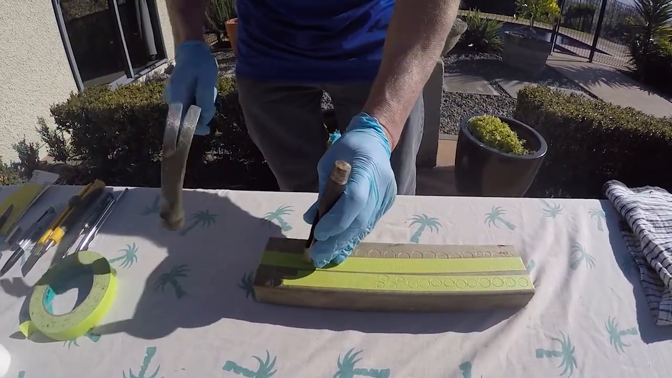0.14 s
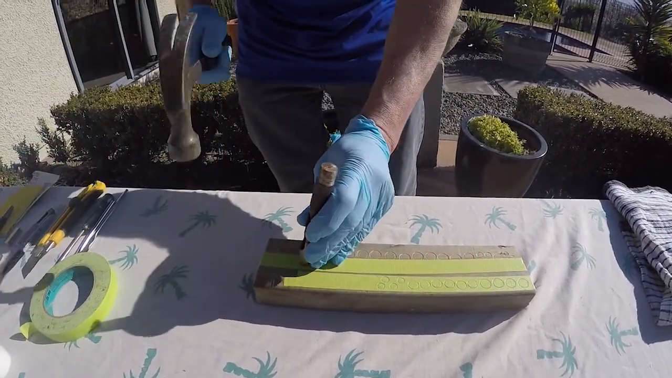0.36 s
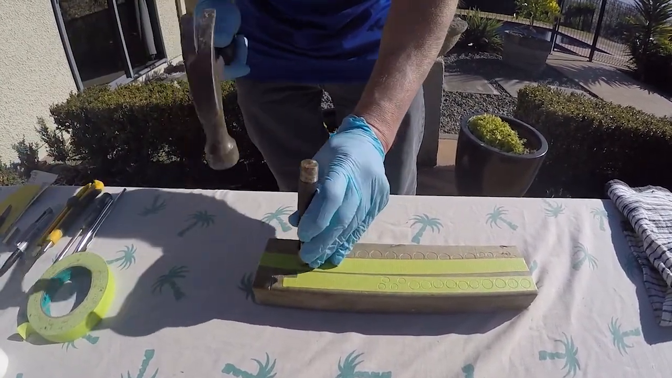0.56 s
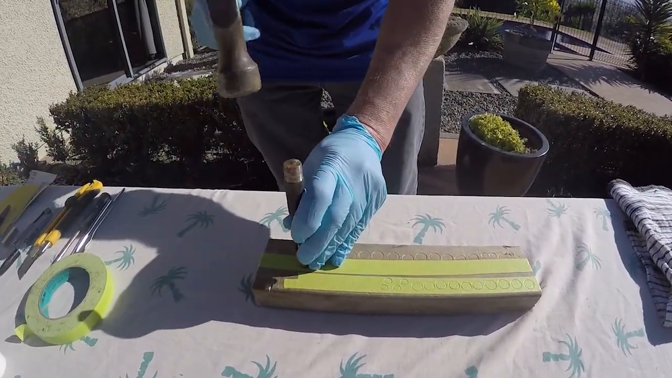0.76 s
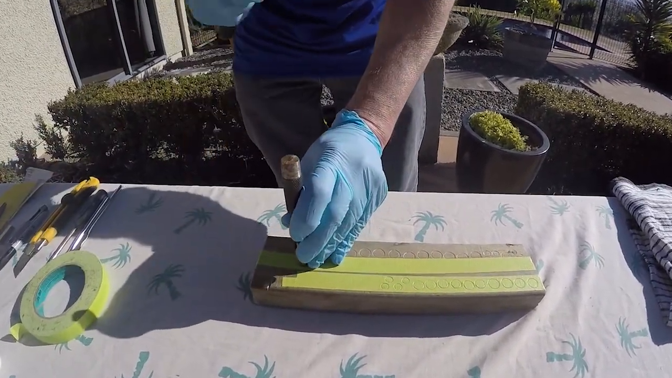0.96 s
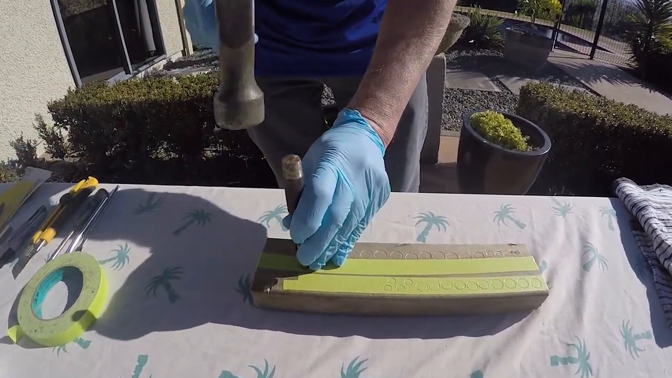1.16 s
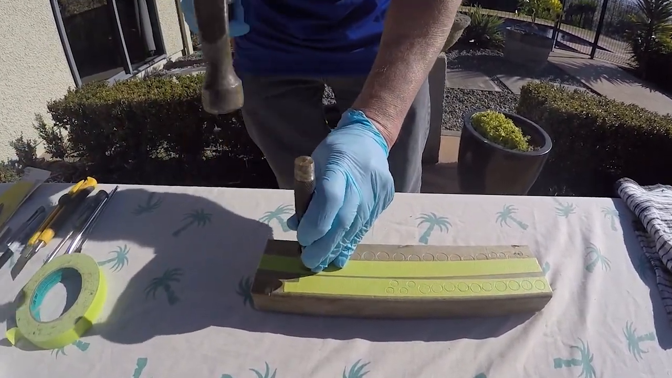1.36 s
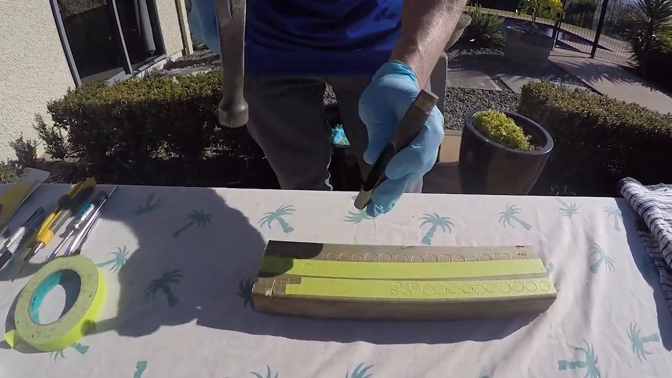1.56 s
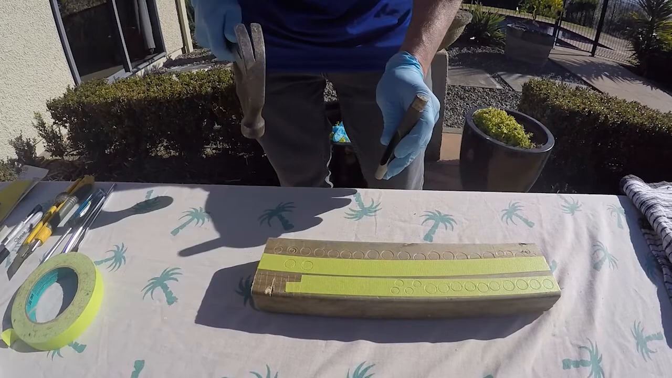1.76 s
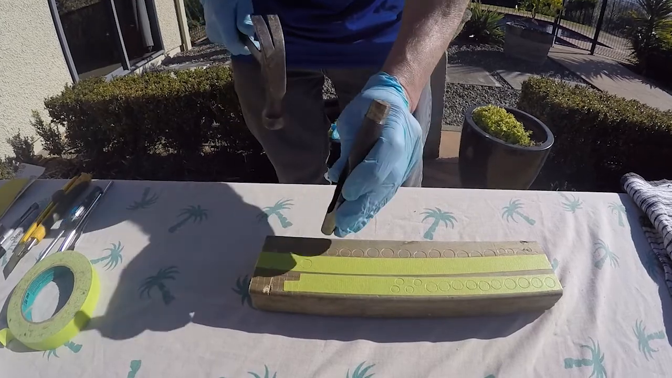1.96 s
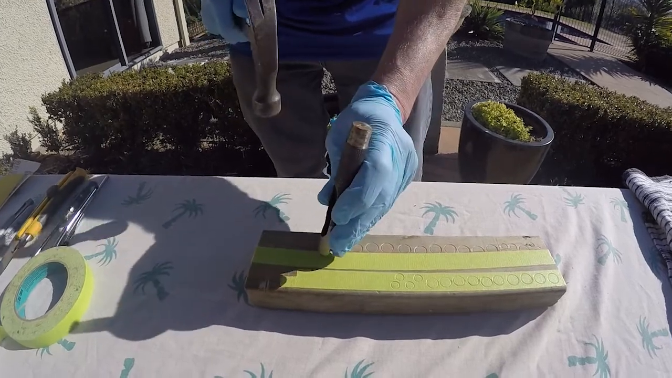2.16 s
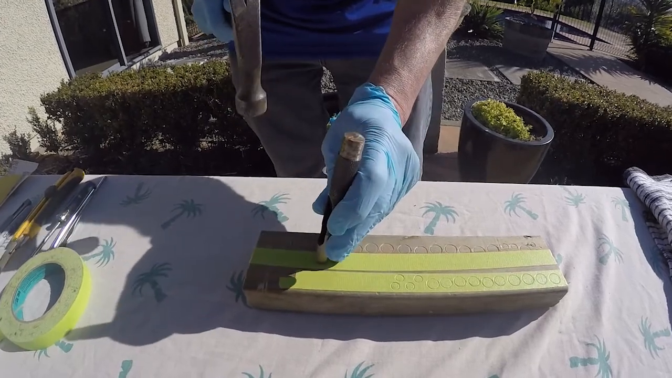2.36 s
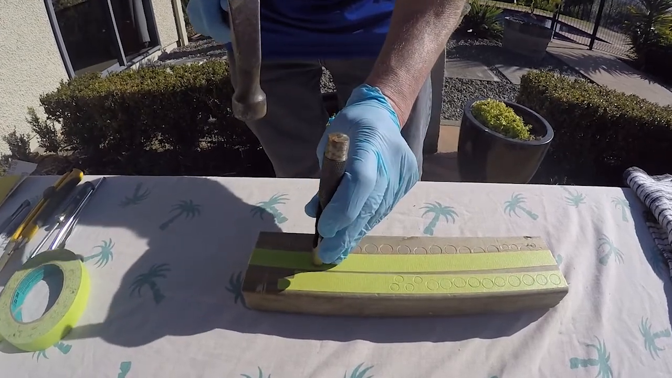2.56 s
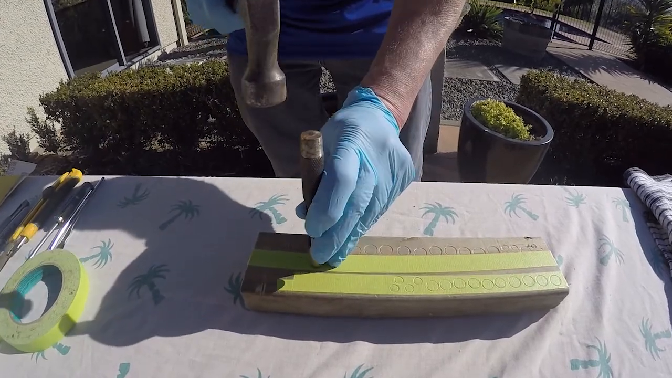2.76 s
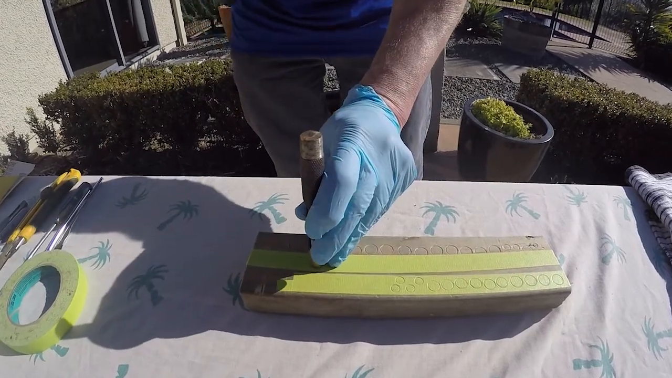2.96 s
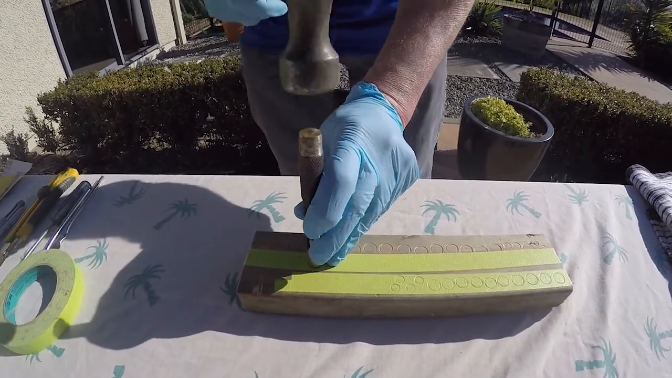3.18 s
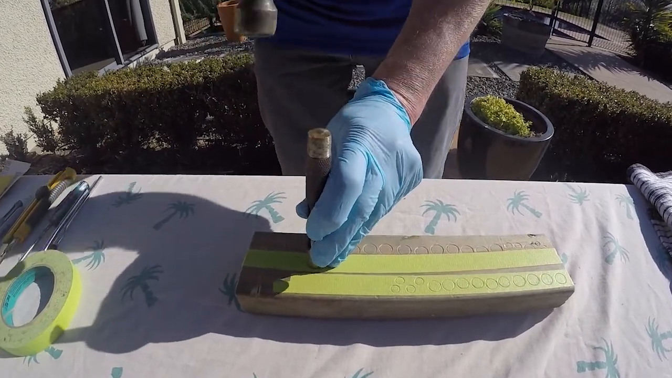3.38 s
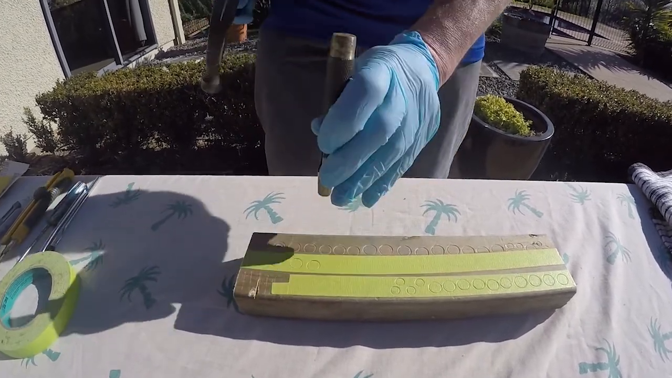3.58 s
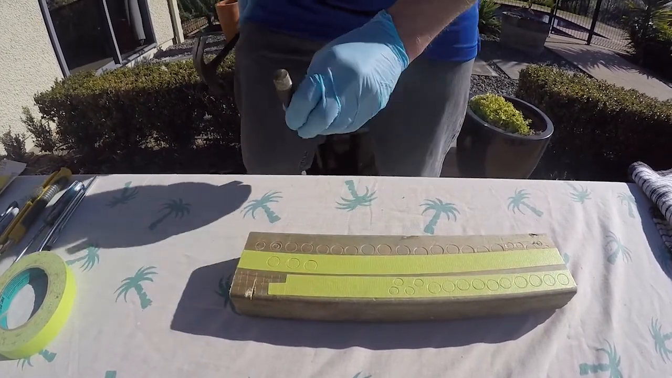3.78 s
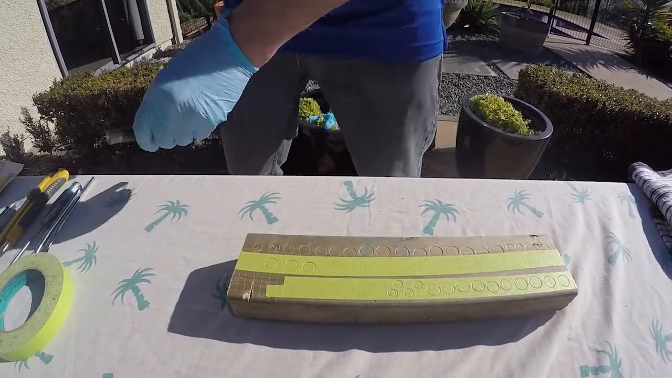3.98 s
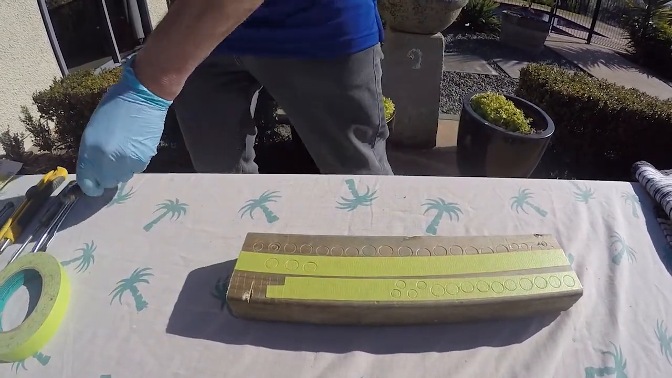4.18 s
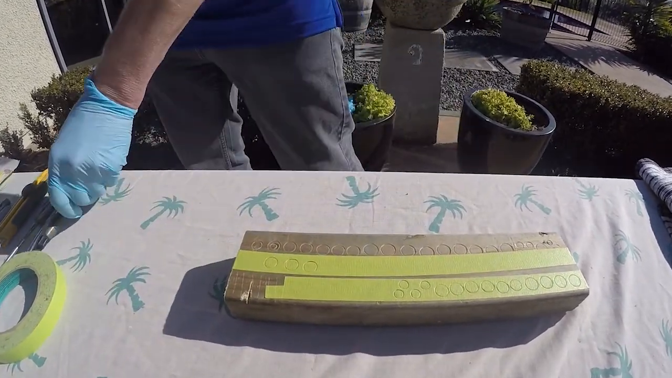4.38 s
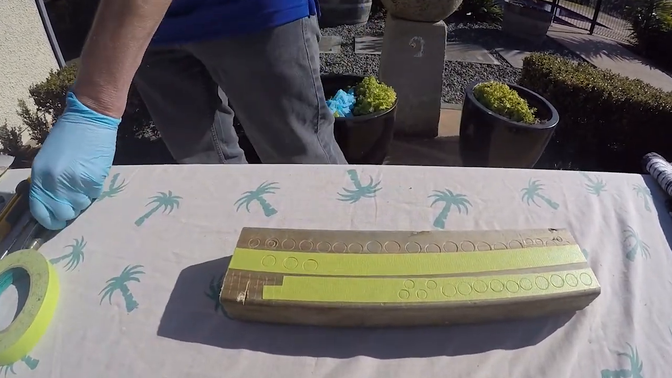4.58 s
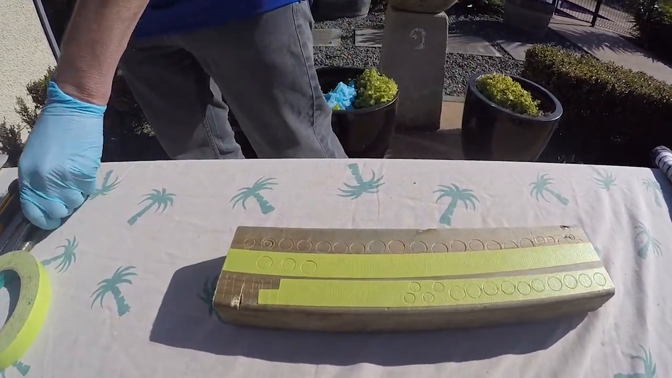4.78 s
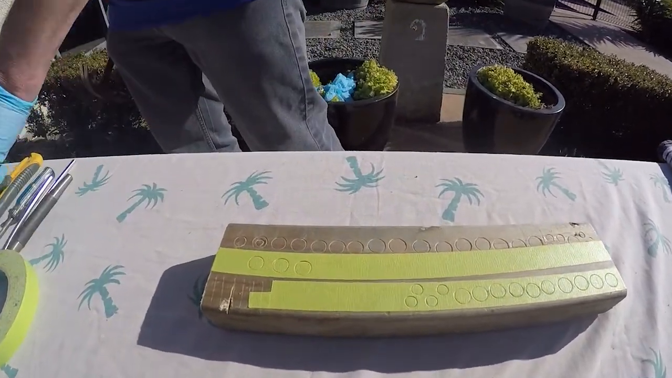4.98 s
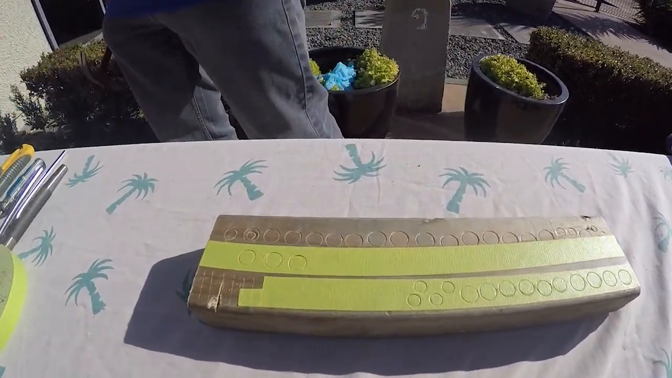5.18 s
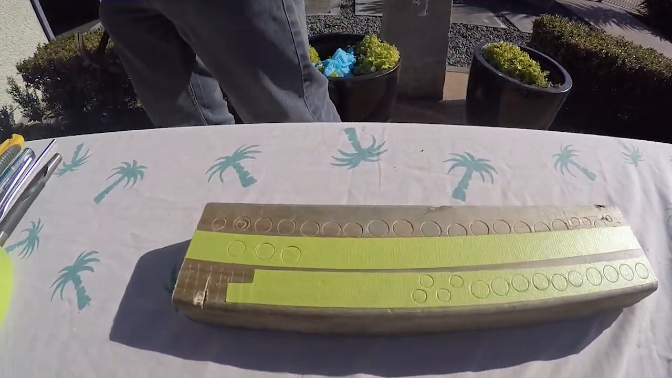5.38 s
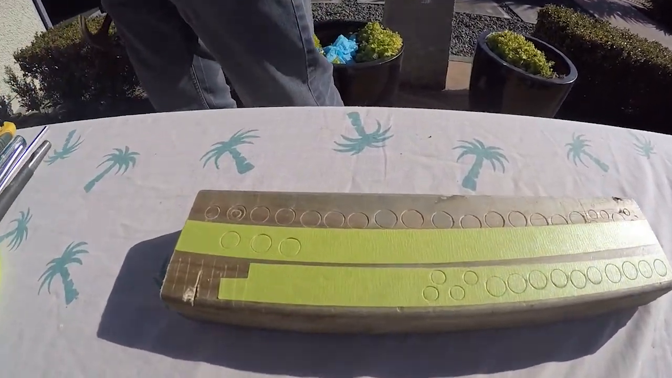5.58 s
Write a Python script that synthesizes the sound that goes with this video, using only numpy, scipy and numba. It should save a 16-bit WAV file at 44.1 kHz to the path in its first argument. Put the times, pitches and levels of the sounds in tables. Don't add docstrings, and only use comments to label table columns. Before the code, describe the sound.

Outdoors, a hammer hits a steel punch on a wooden block twice, loud cracking blows over a low throbbing hum, then both tools are laid down.

```python
import sys
import numpy as np
from scipy import signal
from scipy.fft import rfft, irfft
from scipy.io import wavfile
from scipy.ndimage import uniform_filter1d
from numba import njit

SR = 44100
rng = np.random.default_rng(int(sys.argv[2]) if len(sys.argv) > 2 else 0)


def rack_gain(trim_db):
    fader = np.asarray(trim_db, float)
    return 10 ** (fader / 20)


def unload_audio(sound):
    columns = np.transpose(np.atleast_2d(sound))
    steps = np.round(np.clip(columns, -1, 1) * 32767)
    wavfile.write(sys.argv[1], SR, steps.astype(np.int16))


N = 248660
T = np.arange(N) / SR

# start_s, level_db, steel_ring_db, table_boom_db, punch_ring_db
BLOWS = [
    (1.0628, 9.5, -0.7, -1.5, -5.5),
    (3.094, 8.5, -11, 0.15, 0),
]
# pitch_hz, level_db, t60_s
STEEL = [(2454, -6, .025), (3000, -8, 0.011), (3788, -2.5, 0.019), (4330, -1, 0.013), (5420, -4.5, 0.018),
         (6430, -9.5, 0.0054), (12080, -25, .01)]
# pitch_hz, level_db, t60_s
HAMMER_FACE = [(2876, -4, 0.024), (5095, -2.5, .018), (6030, -8.5, .016), (7880, -8, .02),
               (11075, -13, 0.011)]
# pitch_hz, level_db, t60_s
HAMMER_HEAD = [(2890, -34, .2), (7760, -43, .2), (7951, -40, .28), (8130, -42, .18)]
# pitch_hz, level_db, t60_s
BLOCK = [(638, -14, .06), (841.7, -16, 0.04), (1000, -14, 0.05), (1163, -17.5, .05), (1503, -9.5, .04),
         (1620, -16, 0.05), (2040, -16, 0.03), (2330, -17.5, 0.067)]
# pitch_hz, level_db, t60_s
TABLE = [(52, -18, .12), (93.5, -12, 0.1), (112.2, -2.5, .2), (189.8, -30.5, 0.98), (208.9, -21, .1),
         (257.2, -20, 0.019), (336.3, -22.5, .15), (400, -20, .06), (460, -21, 0.1), (514, -18, 0.09)]
# pitch_hz, level_db, t60_s
LEGS = [(34.8, -11.5, 0.3)]
# delay_s, level_db, centre_hz, smear_t60_s
ECHOES = [(.017, -32.5, 8517, .03), (.042, -31, 3200, 0.013), (.056, -45, 9000, 0.038),
          (.094, -47.5, 7000, 0.057), (.106, -40, 4500, 0.032), (.125, -64, 7000, .5),
          (0.17, -58.5, 3500, 0.084), (.377, -60, 1780, 0.031)]
# pitch_hz, level_db, t60_s
YARD = [(178.4, -27.5, 0.36), (330, -24.5, .3), (570, -24, 0.28), (966, -24, 0.28), (1590, -26.5, .34),
        (2820, -28.5, 0.29), (4500, -37, 0.13), (7000, -45.5, 0.13), (11000, -51, 0.24)]
# start_s, level_db
PUNCH_DOWN = [
    (4.578, -9),
    (4.5806, -10),
]
# pitch_hz, level_db, t60_s
PUNCH = [(375, -8, 0.037), (520, -13, 0.1), (770, -9, 0.015), (930, 2, 0.035), (1176, -4.5, 0.035),
         (1420, -1, 0.031), (1730, -2.5, 0.017), (2060, -7, 0.025), (2580, -1, 0.017), (3250, -2, 0.016),
         (4090, -13, 0.0099)]
# pitch_hz, level_db, t60_s
SHANK = [(4565, -40.5, .29), (4838, -42.5, .19)]
# start_s, level_db
HAMMER_DOWN = [
    (5.5473, -14),
    (5.5512, -26),
]
# pitch_hz, level_db, t60_s
HANDLE = [(400, -8.5, .05), (543, -10, 0.066), (757, -5, 0.08), (984, -2.5, 0.055), (1100, 7, 0.012),
          (1308, -9, 0.05), (1614, -2, 0.055), (2010, -13, 0.025), (3460, -13, 0.014)]
# start_s, peak_db, pitch_hz, t60_s
THUDS = [(0.371, -50, 400, 0.11), (0.374, -30.5, 108, 0.094), (2.54, -37, 330, 0.07),
         (4.566, -23, 700, 0.08), (4.567, -45.5, 5700, 0.1), (4.577, -27, 195, 0.096),
         (5.636, -35, 600, 0.046)]
# start_s, peak_db, pitch_hz
TICKS = [(1.146, -31.5, 2010), (1.198, -30, 3200), (1.2, -38, 9000), (1.440, -49, 8000),
         (3.127, -30, 3000), (3.139, -34.5, 3460), (4.24, -46, 2500), (4.30, -51, 2014),
         (4.622, -58.5, 3980), (5.482, -45.5, 5960), (5.490, -43, 3430), (5.497, -52, 8000),
         (5.497, -40, 2500), (5.511, -61, 9000), (5.522, -50.5, 6000)]
# start_s, hold_s, level_db, rise_s, fall_s (rise and fall over 20 dB)
BRUSH = [(0, 0.15, -62, .05, 0.16), (4.24, 0.035, -58.5, 0.063, 0.16), (4.415, .065, -45, .04, .1)]
# pitch_hz, level_db_per_hz
CLOTH = [(240, -52), (400, -9.5), (1240, -5), (1910, -13), (2050, -8.5), (3670, -21.5), (5480, -25.5),
         (14000, -42.5)]
# start_s, hold_s, level_db, rise_s, fall_s
SLEEVE = [(.12, .08, -71, 0.35, .15), (4.585, .002, -73, .04, .025), (5.5, .002, -58, .04, 0.028)]
# start_s, hold_s, level_db, rise_s, fall_s
SLIDE = [(0, .2, -72, .05, .15)]
SLIDE_HZ = (2500, 4500)
# start_s, level_db, held_end_db, pitch_factor
BIRD = [(.645, -68, 0, 1.), (2.237, -67, -5, .95), (2.83, -70, -40, 1.24), (3.9, -66, -8, 1.)]
# time_s, pitch_hz
CALL = [(0, 4080), (.018, 4050), (.026, 3670), (0.044, 3630), (.052, 3270), (.14, 3190)]
# pitch_hz, level_db_per_hz
TOWN = [(14, -29.5), (24, -2.5), (50, -9), (90, -12.5), (122, -16), (171, -21.5), (342, -32), (600, -35.5),
        (880, -33.5), (1400, -40.5), (2270, -46), (4000, -49.5), (12400, -63.5), (15500, -66)]
# time_s, level_db
SWELL = [(0, 4.5), (.3, 1.5), (1.1, 2), (1.55, 4), (2.1, 2), (3, 2), (3.9, .5), (4.4, 2), (5.64, 4)]
# pitch_hz, wander_width_hz, level_db
HUM = [(38.93, 8, -43), (115.5, 18, -50), (179, 7.2, -68.5)]

FAR_DB, FAR_STRETCH = -29, 2.3
MOTOR_HZ, MOTOR_DB, PARTNER_DB = 78.72, -37, -7.5
FIRST_BEAT_S, BEAT_HZ, SLOWS_S, LATE_BEAT_HZ = 0.035, 2.58, 4.28, 3.71
GAIN_TOP_DB, GAIN_RATIO = -14, 3.7
GAIN_FALL_S, GAIN_HOLD_S, GAIN_RISE_DB_S = 0.01, 0.45, 18


def level(x, db):
    return x * rack_gain(db) / np.sqrt(np.mean(x ** 2))


def band(x, hz, width):
    return signal.lfilter(*signal.iirpeak(min(hz, .45 * SR), hz / width, fs=SR), x)


def steep(count, hz, width):
    once = band(rng.standard_normal(count), hz, width)
    return level(band(once, hz, width), 0)


def colour(shape, count):
    hz, db = np.transpose(shape)
    log_hz = np.log(np.arange(1, count // 2 + 2) * SR / count)
    gain = rack_gain(np.interp(log_hz, np.log(hz), db))
    return irfft(rfft(rng.standard_normal(count)) * gain, count)


def fade(t60, length=1.):
    return np.exp(-np.log(1000) * np.arange(int(length * SR)) / SR / t60)


def walk(rate, count=N):
    k = int(SR / rate)
    steps = np.repeat(rng.standard_normal(count // k + 1), k)
    return 1.3 * uniform_filter1d(uniform_filter1d(steps, k), k)[:count]


def ring(modes, push_s, scatter_db, flip=1):
    t = np.arange(SR) / SR
    luck = rng.standard_normal((len(modes), 2))
    tones = np.zeros(SR)
    for k, (hz, db, t60) in enumerate(modes):
        strength = flip ** k * rack_gain(db + scatter_db * luck[k, 0])
        pitch = hz * (1 + 0.001 * luck[k, 1])
        tones += strength * fade(t60) * np.sin(2 * np.pi * pitch * t)
    push = np.hanning(int(push_s * SR) + 3)
    return np.convolve(tones, push / push.sum())[:SR]


def strokes(rows):
    gain = np.zeros(N)
    for s, hold, db, rise, fall in rows:
        before = np.maximum((s - T) / rise, 0)
        after = np.maximum((T - s - hold) / fall, 0)
        gain += rack_gain(db - 20 * before - 20 * after)
    return gain


def add(out, s, x):
    i = int(s * SR)
    out[i:i + len(x)] += x[:N - i]


def blows():
    out = np.zeros(N)
    for s, db, ring_db, boom_db, punch_db in BLOWS:
        steel = rack_gain(punch_db) * ring(STEEL, push_s=.00005, scatter_db=1.5)
        steel += rack_gain(ring_db) * ring(HAMMER_FACE, push_s=.00005, scatter_db=-2.0)
        steel += rack_gain(ring_db + 4.4 * walk(220, count=SR)) * ring(HAMMER_HEAD, 0, scatter_db=1.0)
        crack = rack_gain(-3) * fade(0.013) * band(rng.standard_normal(SR), 6600, 4200)
        add(out, s, rack_gain(db) * (steel + crack + answer(0.0035, patchy_db=2.1)))
        add(out, s + .0012, rack_gain(db) * ring(BLOCK, push_s=.0002, scatter_db=2, flip=-1.054))
        add(out, s + .0013, -rack_gain(db - 5.5) * np.hanning(int(.0032 * SR)))
        add(out, s + .0032, rack_gain(db + boom_db) * ring(TABLE, push_s=0.0007, scatter_db=1.0))
        add(out, s + .011, -rack_gain(db + boom_db) * ring(LEGS, push_s=.006, scatter_db=0.0))
        for delay, echo_db, hz, t60 in ECHOES:
            smear = fade(t60, .1) * steep(int(.1 * SR), hz, 1.3 * hz)
            add(out, s + delay, rack_gain(db + echo_db) * smear)
    return out


def answer(delay_s, patchy_db, stretch=1.):
    rise = 1 - np.exp(-np.arange(SR) / SR / delay_s)
    grain = rack_gain(patchy_db * walk(300, count=SR))
    walls = np.zeros(SR)
    for hz, db, t60 in YARD:
        decay = fade(stretch * t60) + rack_gain(FAR_DB) * fade(FAR_STRETCH * t60)
        walls += rack_gain(db) * decay * steep(SR, hz, 0.62 * hz)
    return rise * grain * walls


def landing(knocks, modes, push_s, yard_hz):
    out = np.zeros(N)
    for s, db in knocks:
        add(out, s, rack_gain(db - 7.5) * ring(modes, push_s, scatter_db=5.5, flip=-1.032))
        click = ring([(1.46 * yard_hz, 0, .006)], 2 * push_s, scatter_db=-1)
        add(out, s, -rack_gain(db + 4.5) * click)
    reply = answer(0.0012, patchy_db=1.5, stretch=0.88)
    for _ in range(2):
        reply = band(reply, yard_hz, 1.8 * yard_hz)
    first_s, first_db = knocks[0]
    add(out, first_s, rack_gain(first_db + 1.5) * reply)
    return out


def laid_down():
    out = landing(PUNCH_DOWN, PUNCH, push_s=.0002, yard_hz=1700)
    out += landing(HAMMER_DOWN, HANDLE, push_s=.0003, yard_hz=780)
    add(out, PUNCH_DOWN[0][0], ring(SHANK, 0, scatter_db=0.5))
    for s, db, hz, t60 in THUDS:
        shape = fade(t60, .2) * (1 - fade(0.0058, .2))
        add(out, s, rack_gain(db) * shape * steep(int(.2 * SR), hz, 0.67 * hz))
    return out


def ticks():
    out = np.zeros(N)
    for s, db, hz in TICKS:
        add(out, s, rack_gain(db) * fade(0.0085, .05) * steep(int(.05 * SR), hz, 0.98 * hz))
    return out


def brush():
    cloth = colour(CLOTH, N)
    grain = np.zeros(N)
    for hz in (700, 1300, 2500, 5000, 9500):
        grain += band(cloth, hz, .8 * hz) * rack_gain(2.8 * walk(60))
    return level(grain, 0) * strokes(BRUSH)


def sleeve():
    rustle = strokes(SLEEVE) * rack_gain(2.1 * walk(230)) * steep(N, 4910, 10000)
    slide = strokes(SLIDE) * sum(steep(N, hz, 1100) for hz in SLIDE_HZ)
    return rustle + slide


def bird():
    out = np.zeros(N)
    s, hz = np.transpose(CALL)
    t = np.arange(int(s[-1] * SR)) / SR
    turns = np.cumsum(np.interp(t, s, hz)) / SR
    edges = np.clip(np.minimum(t / .006, (t[-1] - t) / .03), 0, 1)
    for start, db, end_db, pitch in BIRD:
        held_end = end_db * np.clip((t - .04) / 0.02, 0, 1)
        gain = rack_gain(db + held_end + 3 * walk(120, count=len(t)))
        add(out, start, gain * edges * np.sin(2 * np.pi * pitch * turns))
    return out


def motor():
    beats = BEAT_HZ * (T - FIRST_BEAT_S) + (LATE_BEAT_HZ - BEAT_HZ) * np.maximum(T - SLOWS_S, 0)
    turns = MOTOR_HZ * T
    partner = rack_gain(PARTNER_DB + 0.75 * walk(3.3)) * np.sin(2 * np.pi * (turns - beats))
    hums = sum(rack_gain(db) * steep(N, hz, width) for hz, width, db in HUM)
    return rack_gain(MOTOR_DB) * (np.sin(2 * np.pi * turns) + partner) + hums


def traffic():
    town = level(colour(TOWN, N), -43.5)
    low = signal.sosfilt(signal.butter(2, 60, fs=SR, output="sos"), town)
    swell = rack_gain(np.interp(T, *np.transpose(SWELL)))
    return (town - low) * swell + low * rack_gain(4.1 * walk(3.1))


def scene():
    tools = blows() + laid_down() + ticks()
    fabric = brush() + sleeve()
    return (tools + fabric + bird() + motor() + traffic())[None]


@njit
def follow(want_db, fall, hold, rise):
    out, g, wait = np.empty(len(want_db)), 0., 0.
    for i in range(len(want_db)):
        if want_db[i] < g:
            g, wait = g + fall * (want_db[i] - g), hold
        elif wait > 0:
            wait -= 1
        else:
            g = min(g + rise, want_db[i])
        out[i] = g
    return out


def band_limit(x):
    return signal.sosfilt(signal.butter(12, 16270, fs=SR, output="sos"), x)


def record(dry):
    loudness = uniform_filter1d(np.abs(dry[0]), size=257, origin=128)
    loud_db = 20 * np.log10(loudness + 1e-9)
    want_db = -np.maximum(loud_db - GAIN_TOP_DB, 0) * (1 - 1 / GAIN_RATIO)
    gain_db = follow(want_db, 1 / (GAIN_FALL_S * SR), GAIN_HOLD_S * SR, GAIN_RISE_DB_S / SR)
    clipped = np.clip(dry * rack_gain(gain_db), -.92, .92)
    top_cut = signal.ellip(10, .1, 60, 15200, fs=SR, output="sos")
    return band_limit(signal.sosfilt(top_cut, clipped))


dry = scene()
out = record(dry)
unload_audio(out)
```